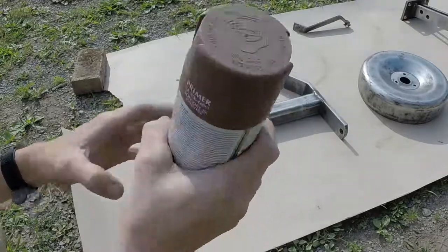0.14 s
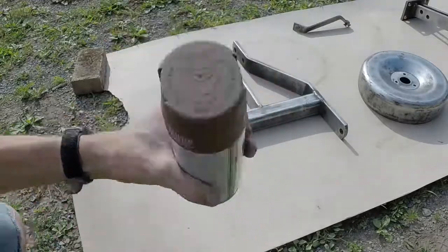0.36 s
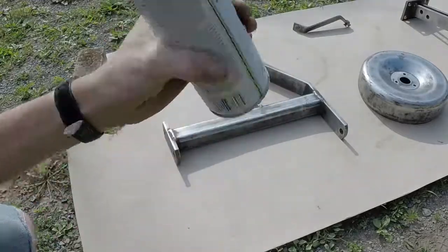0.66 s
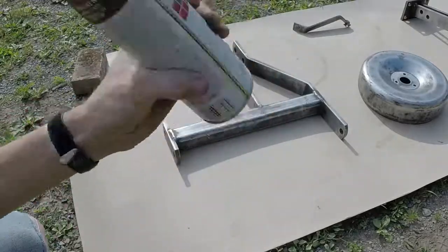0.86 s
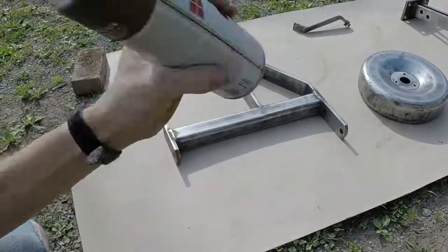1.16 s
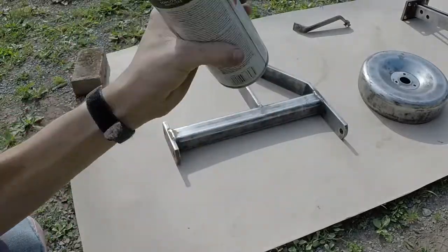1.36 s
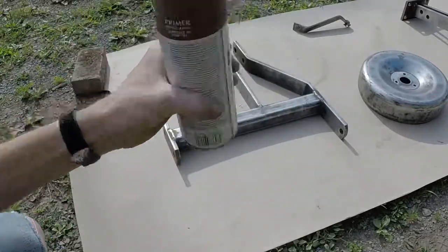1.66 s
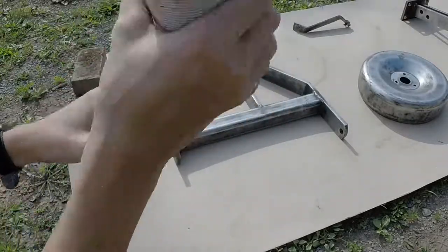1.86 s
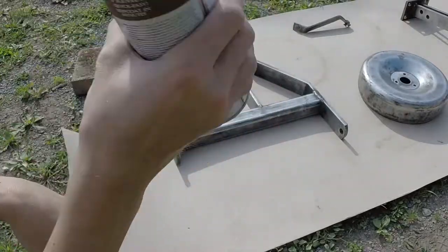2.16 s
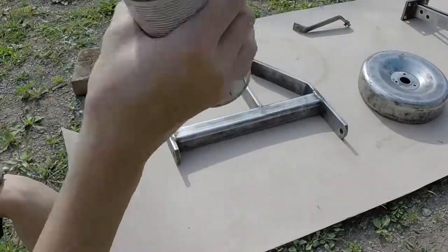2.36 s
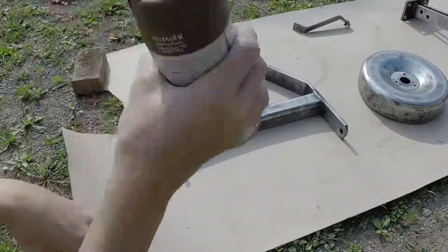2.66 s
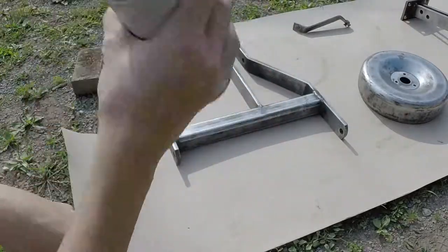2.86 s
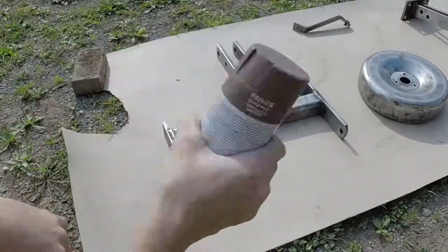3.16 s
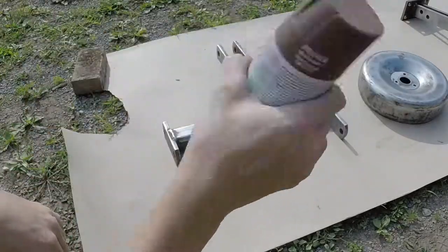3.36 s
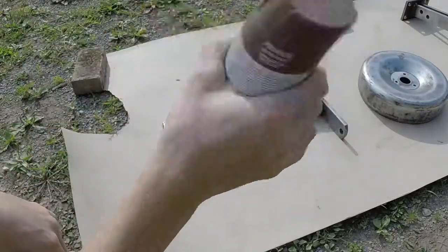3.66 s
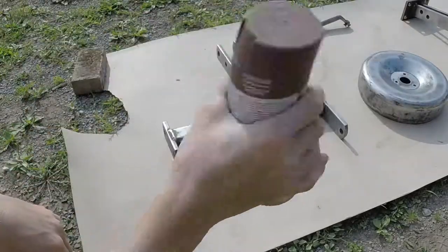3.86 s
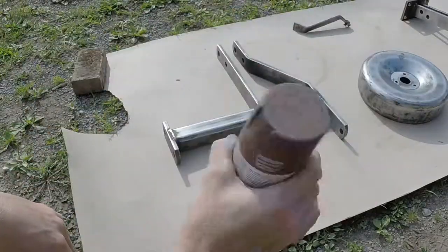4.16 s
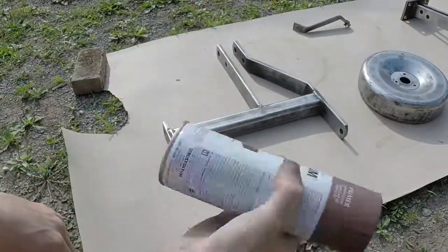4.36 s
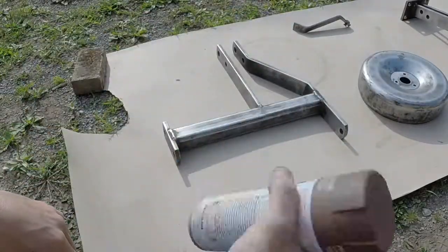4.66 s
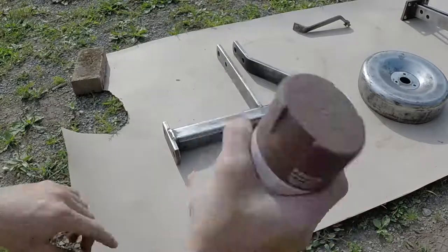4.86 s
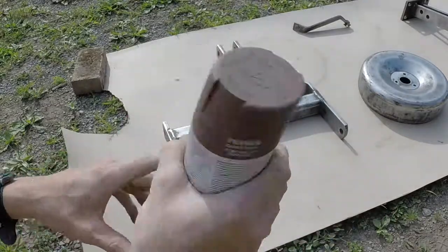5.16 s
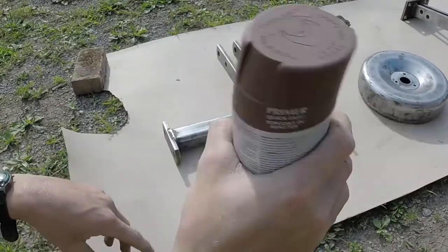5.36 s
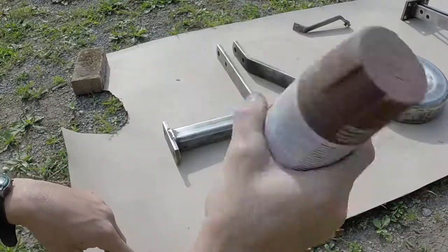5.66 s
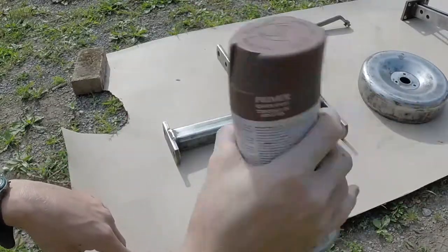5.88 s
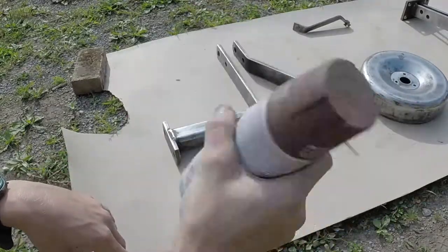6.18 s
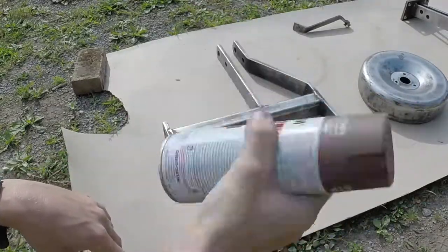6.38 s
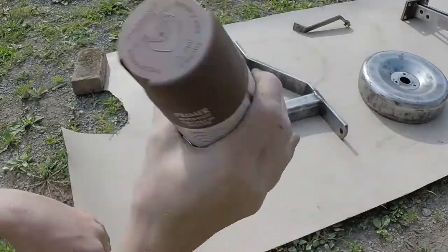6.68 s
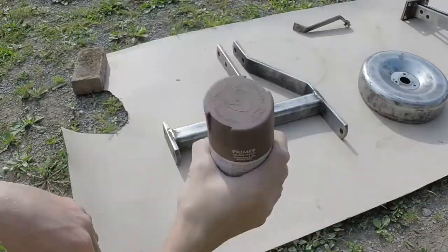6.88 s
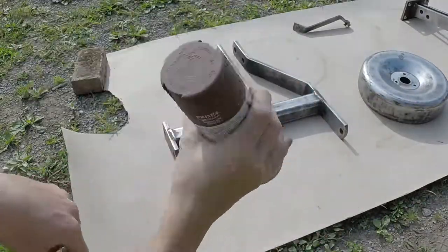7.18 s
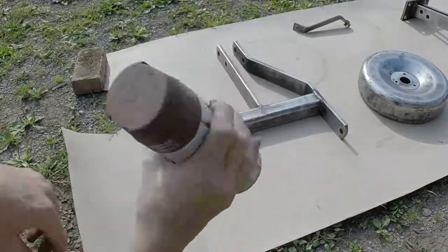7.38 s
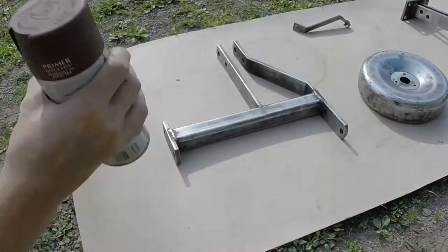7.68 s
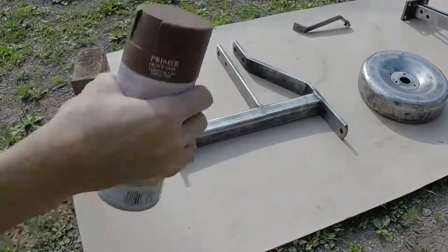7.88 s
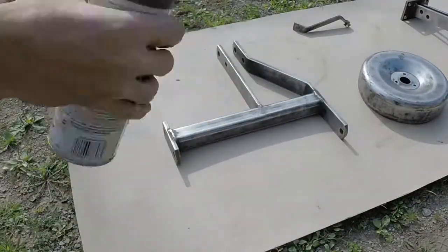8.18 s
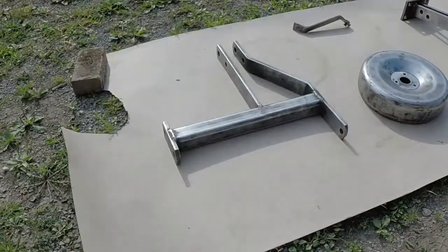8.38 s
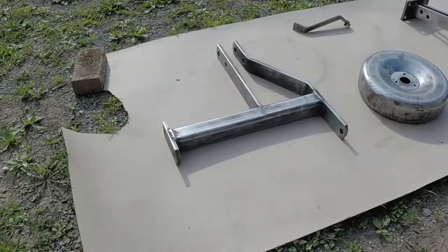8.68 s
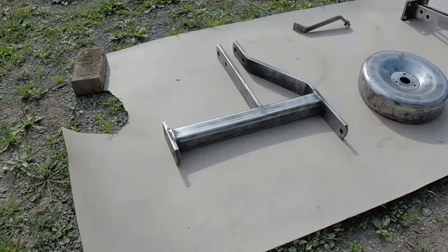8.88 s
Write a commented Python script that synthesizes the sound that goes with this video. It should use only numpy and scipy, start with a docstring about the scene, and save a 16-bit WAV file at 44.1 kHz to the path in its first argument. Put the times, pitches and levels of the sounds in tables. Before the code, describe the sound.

A spray paint can is shaken by hand close to the microphone. Its mixing ball clacks against the ends in short, quick bursts, then swirls around the wall with a rolling metallic rattle. Another run of fast knocks follows before the ball settles with a few light ticks. Behind it is quiet garden air, with a faint, distant frog-like trill and a soft low hum early on.

```python
"""A spray paint can is shaken by hand, close by in a garden. Its mixing ball knocks against the ends
in short bursts and, in the middle part, is swirled round the wall. Each knock is a short, smeared
'chk': the paint-damped modes of the steel shell with a bright tick. Between knocks the ball rolls
with a duller ring. Behind the can are quiet outdoor air, a far frog-like trill and a low hum that
comes and goes."""
import sys
import numpy as np
from scipy import signal
from scipy.fft import rfft, irfft
from scipy.io import wavfile
from scipy.ndimage import uniform_filter1d

SR = 44100
rng = np.random.default_rng(int(sys.argv[2]) if len(sys.argv) > 2 else 0)


def generate_wav(sig):
    """Save sig (samples, or channels by samples) to the path in sys.argv[1] as 16-bit PCM at SR."""
    pcm = np.round(np.clip(np.atleast_2d(sig).T, -1, 1) * 32767).astype(np.int16)
    wavfile.write(sys.argv[1], SR, pcm)


N = 398531


def undb(db):
    """Amplitude ratio of a level in decibels."""
    return 10 ** (np.asarray(db) / 20)


def unit(x):
    """Normalisation to an rms of 1."""
    return x / np.sqrt(np.mean(x ** 2))


def colour(points, hz):
    """Spectral envelope: gain interpolated through (Hz, dB) points along log frequency."""
    knots, db = np.transpose(points)
    return undb(np.interp(np.log(hz + 1), np.log(knots), db))


def wander(rate_hz):
    """Slow random modulation: random steps, smoothed twice, with an rms of 1."""
    step = int(SR / rate_hz)
    levels = np.repeat(rng.standard_normal(N // step + 1), step)
    return unit(uniform_filter1d(uniform_filter1d(levels, step), step)[:N])


def swell(middle_s, length_s):
    """Raised-cosine envelope: one smooth rise and fall."""
    return np.cos(np.pi * np.clip((np.arange(N) / SR - middle_s) / length_s, -.5, .5)) ** 2


def reverberate(x, t60_s):
    """Diffuse reflections decay exponentially; the result is as strong as the input."""
    t = np.arange(SR // 3) / SR
    tail = rng.standard_normal(len(t)) * np.exp(-np.log(1000) * t / t60_s)
    return np.std(x) * unit(signal.fftconvolve(x, tail)[:N])


# The spectrum of outdoor air. Each row: frequency in Hz, relative spectral density in dB.
AIR_SPECTRUM = [(12, -20), (20, -9.5), (49, 0), (294, -6.5), (433, -9.5), (511, -9.5), (571, -10.5),
                (656, -11.5), (1110, -14), (1390, -13.5), (2220, -20), (15000, -41)]
def air(level_db=-54, drift_db=0.4):
    """Outdoor air is broadband noise, strongest in the bass, at a nearly steady level."""
    hz = np.arange(N // 2 + 1) * SR / N
    noise = irfft(rfft(rng.standard_normal(N)) * colour(AIR_SPECTRUM, hz), N)
    return unit(noise) * undb(level_db + drift_db * wander(1.89))


# The swells of the hum. Each row: middle in seconds, length in seconds, peak level in dB.
HUM_SWELLS = [(0.902, 0.49, -54), (1.515, 0.35, -55), (2.057, 0.17, -57), (2.47, 0.29, -51),
              (2.735, 0.37, -49.5), (3.147, 0.33, -55)]
def hum(pitch_hz=100.3, floor_db=-71):
    """Amplitude modulation: a low tone swells and fades above a faint wavering floor."""
    phase = 2 * np.pi * pitch_hz * np.arange(N) / SR + 0.12 * wander(6)
    swells = sum(undb(db) * swell(middle, length) for middle, length, db in HUM_SWELLS)
    return np.sqrt(2) * np.sin(phase) * (undb(floor_db) * wander(3.6) + swells)


# The far trills. Each row: middle in seconds, length in seconds, peak level in dB.
TRILL_CALLS = [(0.643, 1.36, -53), (2.036, 2.2, -60), (5.264, 0.87, -55), (7.2, 0.98, -56.5)]
def trills(pitch_hz=1590, fall_hz=170, pulse_hz=47.36, jitter_rad=0.69):
    """A pulse train on a sinking carrier makes a trill; reverberation blurs it with distance."""
    t, out = np.arange(N) / SR, 0
    cycle = (t * pulse_hz) % 1
    pulses = np.sin(np.pi * cycle) ** 6
    for middle, length, db in TRILL_CALLS:
        pitch = pitch_hz - fall_hz * np.clip((t - middle) / length, -.5, .5)
        phase = 2 * np.pi * pitch * (cycle - .5) / pulse_hz + jitter_rad * wander(110)
        out = out + undb(db) * swell(middle, length) * unit(pulses * np.sin(phase))
    return reverberate(out, t60_s=0.12)


def garden_echo(x, slap_s=0.02, slap_db=-19, tail_db=-24):
    """Reflection from a nearby surface gives one echo; scattering in the garden adds a short tail."""
    slap = np.pad(x, (int(slap_s * SR), 0))[:N]
    return undb(slap_db) * slap + undb(tail_db) * reverberate(x, t60_s=0.054)


# The tick of steel on steel. Each row: frequency in Hz, relative level in dB.
TICK_SPECTRUM = [(700, -16), (2000, 5), (6000, 7), (8500, -1.5), (9800, -6), (11000, -6), (11900, 2),
                 (13200, -12), (14800, -11.5), (15700, -32)]
def steel_tick(force, hz):
    """A brief, hard contact radiates treble: the force spectrum is shaped into that of a tick."""
    return force * colour(TICK_SPECTRUM, hz)


# The modes of the paint-damped can. Each row: frequency in Hz, bandwidth in Hz, relative level in dB.
SHELL_MODES = [(1064, 200, -11), (1538, 310, -11.5), (1749, 166, -6.5), (2156, 66, -2), (2418, 106, 6),
               (2718, 220, -5.5), (3142, 106, -1.5), (3345, 94, -4), (3480, 100, -4.5), (3760, 120, -10.5),
               (4360, 220, -13), (4550, 102, -10), (4665, 112, -6), (5010, 67, -20), (5634, 166, -15.5),
               (6700, 410, -28.5), (6990, 150, -24.5), (7640, 86, -23)]
def can_modes(hz, skirt_octaves=0.93, low_hz=1300, high_hz=7900):
    """Each mode is a damped resonator radiating near its own pitch; one complex response a row."""
    centre, width, db = np.transpose(SHELL_MODES)[:, :, None]
    resonance = 1j * hz * width / (centre ** 2 - hz ** 2 + 1j * hz * width)
    skirt = 1 / (1 + (np.log2((hz + 1) / centre) / skirt_octaves) ** 2)
    # the small shell radiates no bass, and paint deadens its top
    band = 1 / np.sqrt((1 + (low_hz / (hz + 1)) ** 10) * (1 + (hz / high_hz) ** 20))
    return undb(db) * skirt * band * resonance


def shot_noise(samples, per_s, spread_db=3):
    """Shot noise: impulses at random times, uneven in size and sign."""
    sign, strength = rng.standard_normal((2, samples))
    return (rng.random(samples) < per_s / SR) * np.sign(sign) * undb(spread_db * strength)


# The swirls, in which the ball slides round the wall. Each row: start in seconds, end in seconds,
# level of a usual bump in dB, hardness (the higher, the brighter the blow).
SWIRL_SPANS = [(3.25, 4.176, -48.5, 5.5), (4.18, 4.919, -42, -7), (5.705, 6.617, -43, -4.5)]
def rolling(loose_db=-55.5, rest_s=8.15, settle_db_per_s=16, swirl_re_bump_db=-5.5, ramp_s=0.042):
    """Rolling contact: the ball lurches along the wall, cushioned by paint, so the can rings duller."""
    t, hz = np.arange(N) / SR, np.arange(N // 2 + 1) * SR / N
    lurch_db, tilt_db_per_octave, tick_db = 6, -4, -28
    force = rfft(shot_noise(N, per_s=5000) * undb(lurch_db * wander(60)))
    wall = np.sqrt((np.abs(can_modes(hz)) ** 2).sum(axis=0))
    cushion = undb(tilt_db_per_octave * np.log2(np.clip(hz, 2000, 4000) / 3000))
    ring = unit(irfft(force * wall * cushion, N))
    tick = undb(tick_db) * unit(irfft(steel_tick(force, hz), N))
    # soft while the can moves at all, louder in a swirl
    effort = undb(loose_db - settle_db_per_s * np.maximum(t - rest_s, 0))
    for start, end, db, _ in SWIRL_SPANS:
        ramp = np.clip(np.minimum(t - start, end - t) / ramp_s, 0, 1)
        effort = np.maximum(effort, undb(db + swirl_re_bump_db) * ramp)
    return (ring + tick) * effort


# The clearest knocks as the can is swirled or turned, plus a few extra knocks between strokes, such as the ball
# falling back just after the first stroke. Each row: time in seconds, level in dB.
CLEAR_KNOCKS = [(0.043, -37.5), (0.081, -40), (0.203, -50), (0.456, -45), (0.663, -48), (1.517, -44.5),
                (2.479, -39.5), (3.277, -40.5), (3.314, -35.5), (3.35, -32), (3.374, -32), (3.422, -37),
                (3.451, -33.5), (3.478, -32.5), (3.513, -28.5), (3.552, -29), (3.624, -28.5),
                (3.658, -25.5), (3.714, -31), (3.734, -34), (3.767, -34), (3.814, -28.5), (3.863, -31.5),
                (3.903, -30.5), (3.959, -34.5), (4.047, -35), (4.112, -32), (4.214, -37), (4.322, -38.5),
                (4.437, -36.5), (4.498, -37.5), (4.656, -38.5), (4.76, -36.5), (4.863, -44), (5.012, -39.5),
                (5.275, -37.5), (5.468, -39.5), (5.506, -40.5), (5.571, -39), (5.603, -41), (5.654, -39),
                (5.726, -35.5), (5.855, -36.5), (5.912, -41), (6.057, -35), (6.098, -36), (6.136, -37.5),
                (6.208, -38.5), (6.238, -39), (6.292, -38.5), (8.625, -48)]
def wall_knocks(turns_per_s=24, jitter_s=.006, spread_db=1, clear_s=.028, hardness=-2, tick_db=-23.5):
    """Clear knocks, mostly against the side wall, and, away from them, a bump on each orbit of a swirled ball."""
    knocks, knock_times = list(CLEAR_KNOCKS), np.transpose(CLEAR_KNOCKS)[0]
    for turn, (late, loud) in enumerate(rng.standard_normal((240, 2))):
        s = turn / turns_per_s + jitter_s * late
        if np.abs(knock_times - s).min() > clear_s:
            knocks += [(s, db + spread_db * loud) for start, end, db, _ in SWIRL_SPANS if start < s < end]
    out = []
    for s, db in knocks:
        in_swirl = (hard for start, end, _, hard in SWIRL_SPANS if start < s < end)
        out.append((s, db, next(in_swirl, hardness), tick_db))
    return out


# The strokes of the hand, about ten a second. Each row: time in seconds, level in dB, hardness,
# tick level in dB relative to the blow, before the lift that all ticks get.
HAND_STROKES = [(0.012, -29, 9, -14.5), (0.126, -27, 6.5, -19.5), (0.734, -35.5, 3, -30),
                (0.84, -34, 3, -30), (0.94, -30.5, 2, -22), (1.034, -25.5, 6.5, -18.5),
                (1.134, -27.5, 5.5, -23), (1.221, -28.5, 11, -14), (1.313, -31, 4, -25),
                (1.397, -23.5, 4, -26), (1.593, -44, 7, -13), (1.68, -35.5, 3, -14),
                (2.089, -33.5, -1, -14.5), (2.176, -28.5, 4.5, -33), (2.267, -44, -4, -16),
                (2.504, -32.5, 21, -15), (2.596, -31.5, 9, -18), (2.676, -18, 15.5, -25),
                (2.782, -22, 8.5, -24.5), (2.915, -31, 4, -28), (3.028, -25, 7, -29),
                (3.167, -28.5, 0, -26), (6.639, -27.5, 4.5, -15), (6.74, -25, 15, -15.5),
                (6.856, -42.5, 1, -8), (6.945, -35, 10, -16), (7.034, -28.5, 10.5, -17),
                (7.153, -33, 6.5, -14.5), (7.246, -33.5, 8.5, -25), (7.352, -28, 8, -16),
                (7.447, -29.5, 6, -23), (7.551, -22.5, 11, -20), (7.706, -46, 4, -12),
                (7.783, -33, 7.5, -21), (7.894, -25.5, 14, -18.5), (8.013, -31.5, 3.5, -18),
                (8.102, -25.5, 11.5, -21), (8.213, -25, 6.5, -18), (8.35, -37.5, 5, -36),
                (8.434, -31.5, 2, -23), (8.533, -41, 7, -27), (9.027, -41.5, 5, -11.5)]
def end_knocks(pause_s=.17, return_share=.46, return_db=-38.5, quick_gap_s=0.08, fade_db_per_s=95):
    """Inertia throws the ball against one end on each stroke; it falls back unless the hand pauses."""
    return_hardness, return_tick_db = -4.5, -15  # a dull blow, rich in tick
    out = list(HAND_STROKES)
    for (s, db, _, _), (next_s, _, _, _) in zip(HAND_STROKES, HAND_STROKES[1:]):
        gap = next_s - s
        if gap < pause_s:
            # the slower the shake, the weaker the return
            back_db = min(return_db - fade_db_per_s * (gap - quick_gap_s), db + 1.5)
            out.append((s + return_share * gap, back_db, return_hardness, return_tick_db))
    return out


def blows(knock_width_s=0.008, swirl_width_s=0.0091, mode_spread_db=2, tick_lift_db=2, ripple_db=5.5):
    """Impact rings the can's modes; each knock is a 'chk' that swells and fades within some 25 ms."""
    size, lead = 8192, 2048
    light_blow_db, scrape_db = -37, -62
    t, hz = (np.arange(size) - lead) / SR, np.arange(size // 2 + 1) * SR / size
    modes = can_modes(hz)
    scrape_band = np.exp(-.5 * ((hz - 6800) / 800) ** 2)
    # hard blows favour the stiff ends (3-5 kHz), soft ones the wall
    db_per_hardness = 0.9 * np.interp(hz, [1910, 2480, 3160, 4530, 6400], [-0.99, -0.51, 0.47, 0.46, 0.17])
    # the heavier the blow, the more the domed base rings above the rest
    dome = 0.14 * np.exp(-.5 * ((hz - 3350) / 380) ** 2)
    ripple_hz = np.linspace(0, SR / 2, size // 64)
    out = np.zeros(N + 2 * size)
    for s, db, hardness, tick_db in end_knocks() + wall_knocks():
        swirled = any(start < s < end for start, end, _, _ in SWIRL_SPANS)
        envelope = np.exp(-.5 * np.abs(t / (swirl_width_s if swirled else knock_width_s)) ** 2.42)
        burst = rfft(shot_noise(size, per_s=7000) * envelope)
        # every spot on the wall drives the modes with its own signs and strengths
        signs = rng.choice([-1, 1], len(modes))
        coupling = signs * undb(mode_spread_db * rng.standard_normal(len(modes)))
        tone = undb(hardness * db_per_hardness + max(db - light_blow_db, 0) * dome)
        ring = undb(db) * unit(irfft(burst * (coupling @ modes) * tone))
        # the tick rings crowded high modes, a different few each time
        ripple = undb(ripple_db * np.interp(hz, ripple_hz, rng.standard_normal(len(ripple_hz))))
        tick = undb(db + tick_db + tick_lift_db) * unit(irfft(steel_tick(burst, hz) * ripple))
        scrape = swirled * undb(scrape_db) * unit(irfft(burst * scrape_band))
        at = int(s * SR)
        out[at:at + size] += (ring + tick + scrape) * np.sqrt(np.mean(envelope ** 2))
    # each blow sounds about 2 ms ahead of its listed time
    return out[lead + int(.002 * SR):][:N]


def scene():
    """Superposition of the close can, its echo and the garden behind it."""
    garden = trills() + hum() + air()
    can = rolling() + blows()
    return (can + garden_echo(can) + garden)[None]


def record(dry, cutoff_hz=15500):
    """A steep elliptic low-pass filter removes the highest treble."""
    return signal.sosfilt(signal.ellip(8, .2, 70, cutoff_hz, fs=SR, output="sos"), dry)


dry = scene()
out = record(dry)
generate_wav(out)
```